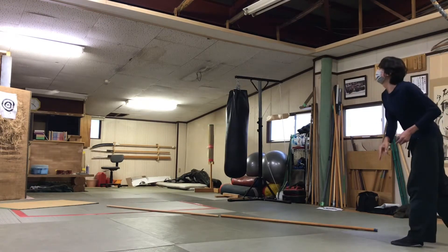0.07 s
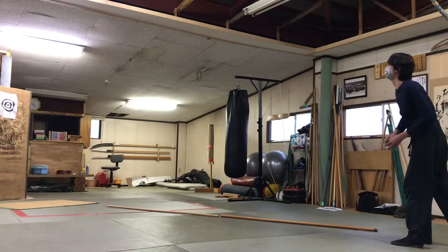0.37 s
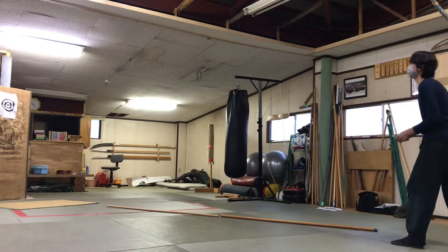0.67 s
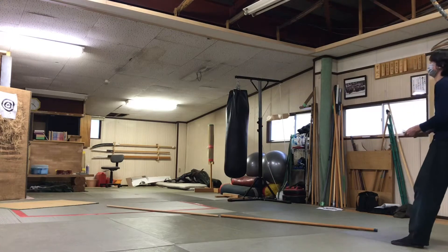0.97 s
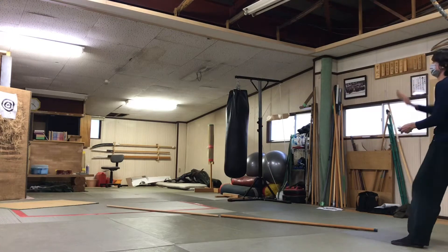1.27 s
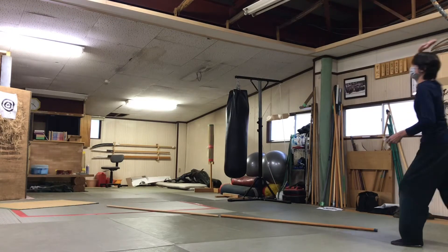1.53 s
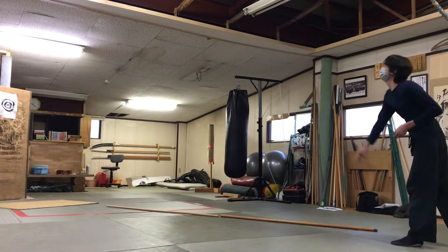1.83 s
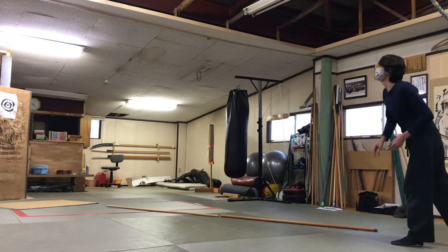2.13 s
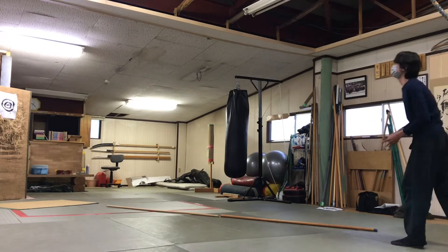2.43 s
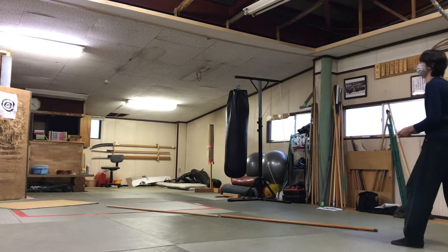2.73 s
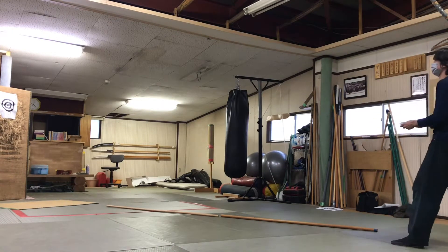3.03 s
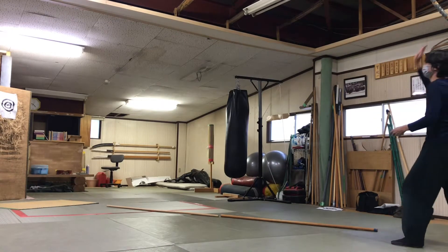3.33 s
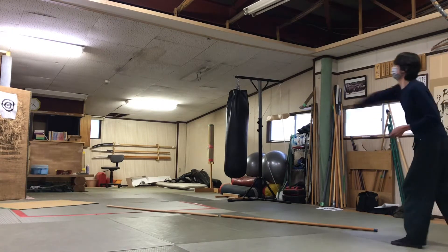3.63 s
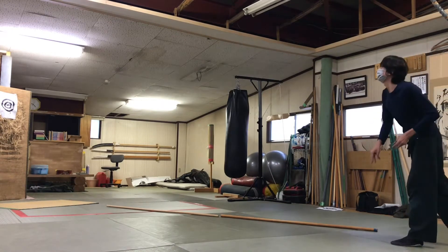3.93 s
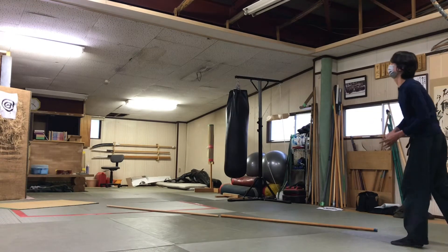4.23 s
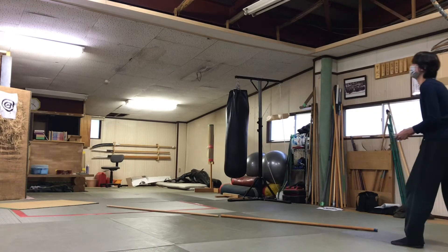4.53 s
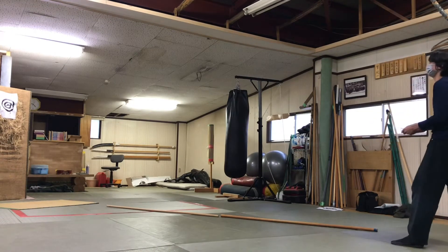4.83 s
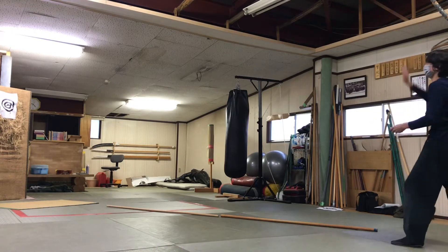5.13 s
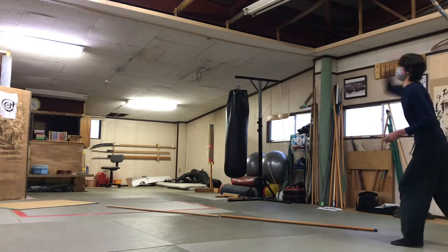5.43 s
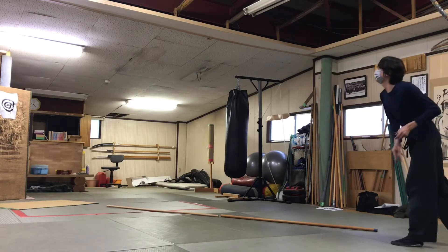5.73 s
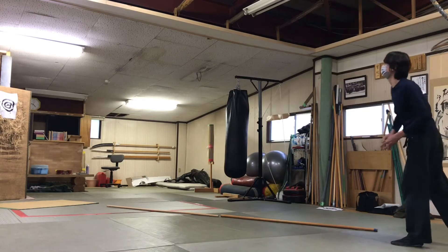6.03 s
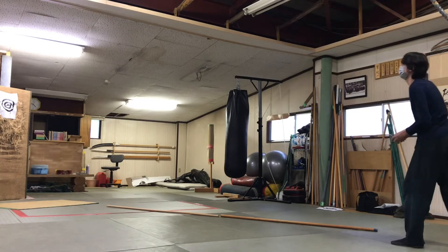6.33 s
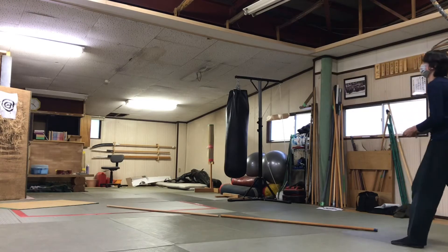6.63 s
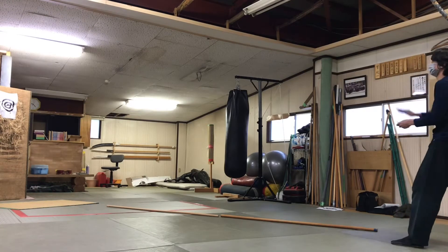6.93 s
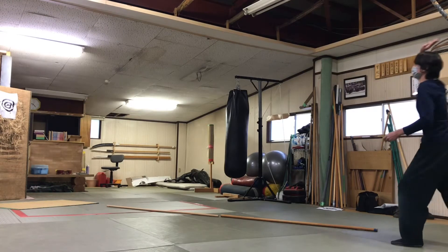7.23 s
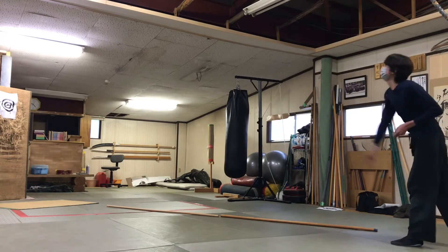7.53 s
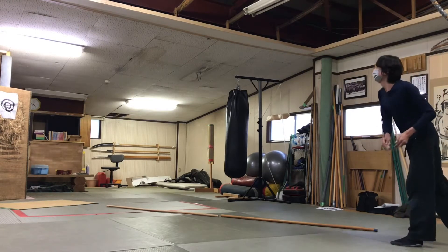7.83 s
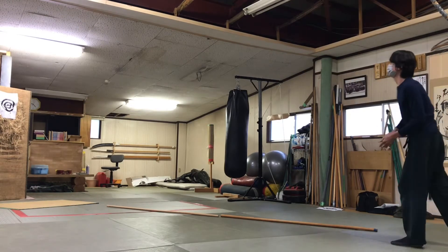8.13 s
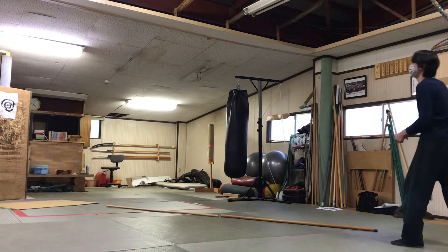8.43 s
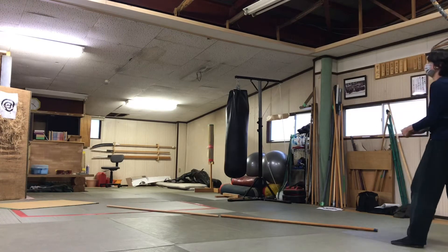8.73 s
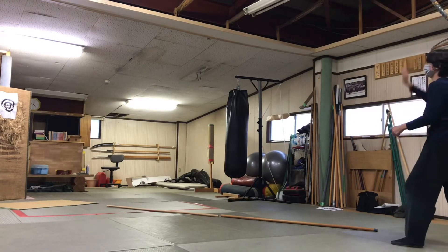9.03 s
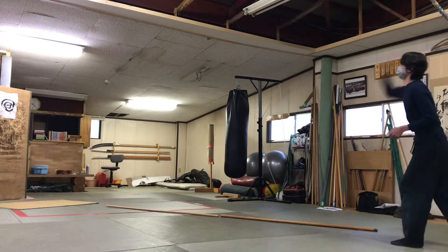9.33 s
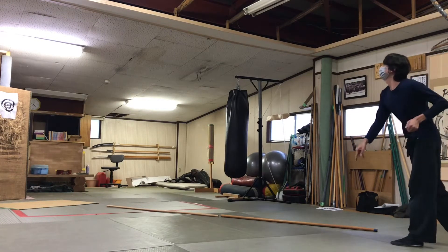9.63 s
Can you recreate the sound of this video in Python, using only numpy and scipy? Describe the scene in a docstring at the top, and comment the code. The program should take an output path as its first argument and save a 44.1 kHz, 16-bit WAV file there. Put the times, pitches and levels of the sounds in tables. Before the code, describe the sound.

Steel spikes are thrown into a wooden target board in an indoor training hall. Five hits land about two seconds apart, each a sharp crack with a low thump and a short room echo. A faint sleeve swish, sometimes with a metallic zing, leads into the throws. Spare spikes clink lightly in the hand between them. A soft step and a last swish follow, over quiet room air.

```python
"""Five steel spikes are thrown into a wooden target board in a matted training hall.
Each throw is a swish of the sleeve, then a crack as the point splits the wood and a thump
as the board flexes, both carried on by the hall. Between throws the spare spikes clink in the
thrower's hand. Near the end come a soft step and one more swish. Behind it all are room air,
a thin hiss, a low hum and a distant rumble."""
import sys
import numpy as np
from scipy import signal
from scipy.fft import rfft, irfft, next_fast_len
from scipy.io import wavfile

SR = 44100
rng = np.random.default_rng(int(sys.argv[2]) if len(sys.argv) > 2 else 0)


def to_wav(s):
    """Save 16-bit WAV."""
    ch = np.atleast_2d(s).T  # columns
    pcm = np.round(np.clip(ch, -1, 1) * 32767)  # PCM
    wavfile.write(sys.argv[1], SR, pcm.astype(np.int16))


N = 431719
TIME = np.arange(SR) / SR  # one second, the life of a blow


def amp(db):
    """Turn decibels into a number to multiply a sound by."""
    return 10 ** (np.asarray(db) / 20)


def unit_energy(x):
    """Scale a sound so that its squared samples add up to 1."""
    return x / np.sqrt(np.sum(x ** 2) + 1e-20)


def look_up(points, hz):
    """Read a (frequency, value) table, joining its points by lines on a log frequency axis."""
    known_hz, value = np.transpose(points)
    return np.interp(np.log(hz + 1), np.log(known_hz + 1), value)


def add(mix, start_s, sound):
    """Mix a sound in at the given time, cutting off whatever runs past the end."""
    part = mix[max(round(start_s * SR), 0):][:len(sound)]
    part += sound[:len(part)]


def noise(spectrum, size):
    """Steady noise shaped by a (frequency, level) table, with an average (rms) size of 1."""
    length = next_fast_len(size)
    gain = amp(look_up(spectrum, np.fft.rfftfreq(length, 1 / SR)))
    shaped = irfft(rfft(rng.standard_normal(length)) * gain, length)[:size]
    return shaped / np.sqrt(np.mean(shaped ** 2) + 1e-20)


def colour(x, spectrum, peaks=(), bright_db=0, size=8192):
    """Filter a sound: give it a broad tone, ringing peaks (or dips) and more or less treble."""
    hz = abs(np.fft.fftfreq(size, 1 / SR))
    db = look_up(spectrum, hz) + bright_db * hz ** 2 / (hz ** 2 + 5500 ** 2)
    for centre, width, height_db in peaks:
        db = db + height_db / (1 + (2 * (hz - centre) / width) ** 2)
    # this makes the filter ring only after a sound, never before it
    log_gain = np.conj(signal.hilbert(np.log(amp(db))))
    response = np.fft.ifft(np.exp(log_gain)).real
    return signal.fftconvolve(x, response[:size // 2])[:len(x)]


def hall(build_s):
    """Echoes off the walls build up over build_s, then each pitch dies away at its own rate."""
    # how long the hall rings: (frequency [Hz], time to fade by 60 dB [s])
    fade_times = [(50, 0.61), (110, 0.22), (220, .5), (560, 0.42), (1500, 0.46), (3800, 0.54), (6000, 0.49),
                  (10000, 0.45), (15000, 0.28)]
    echoes = rng.standard_normal(SR)
    echoes *= np.exp(0.67 * np.exp(-TIME / 0.046) * rng.standard_normal(SR))  # uneven at first
    hz, t, bands = signal.stft(echoes, SR, nperseg=256)
    fade = amp(-60 * t / look_up(fade_times, hz)[:, None])
    tail = signal.istft(bands * fade, SR, nperseg=256)[1][:SR]
    return unit_energy(tail * (1 - np.exp(-TIME / build_s)))


def crunch(length_s):
    """A brief burst of tiny cracks that come in clumps."""
    clumps = np.interp(TIME, np.linspace(0, 1, 900), rng.standard_normal(900))
    cracks = rng.standard_normal(SR) * np.exp(0.35 * clumps)
    rise = 1 - np.exp(-TIME / 0.0003)
    return unit_energy(cracks * rise * np.exp(-(TIME / length_s) ** 2.8))


def background():
    """Room air, a thin hiss, a distant rumble that comes and goes, and a wavering, fading hum."""
    # tone of the room air: (frequency [Hz], relative level [dB])
    air_tone = [(55, -27.5), (90, 2), (128, -10), (200, -2.5), (256, -5), (290, -7), (445, -13.5),
                (620, -8.5), (1000, -14), (2000, -21.5), (4000, -27), (5200, -31), (10000, -35.5),
                (13000, -60.5)]
    # tone of the hiss: (frequency [Hz], relative level [dB])
    hiss_tone = [(7000, -10), (10500, -6.5), (11400, -3.5), (11850, 6.5), (12400, -6), (14000, -4),
                 (16000, 0)]
    # tone of the rumble: (frequency [Hz], relative level [dB])
    rumble_tone = [(15, -32), (30, -13.5), (42, 2), (52, 4.5), (62, -6), (75, -10.5), (100, -24.5),
                   (200, -52.5)]
    # how the rumble swells and sinks: (time [s], relative level [dB])
    rumble_swells = [(0.0, -70.5), (6.9, -66), (7.2, -55), (7.71, -64), (8.13, -57.5), (8.83, -69.5),
                     (9.24, -59.5), (9.79, -65.5)]
    hum_hz, hum_db, fade_db_per_s = 65, -58, 0.8
    t = np.arange(N) / SR
    rumble_db = 3.5 + np.interp(t, *np.transpose(rumble_swells))
    rumble = amp(rumble_db) * noise(rumble_tone, N)
    waver = noise([(0, 0), (2, 0), (8, -30), (40, -100)], N)  # slow drift of pitch and loudness
    hum = np.sin(2 * np.pi * np.cumsum(hum_hz + 0.5 * waver) / SR)
    hum *= (1 + 0.13 * waver) * amp(hum_db - fade_db_per_s * t)
    return amp(-63.5) * noise(air_tone, N) + amp(-69) * noise(hiss_tone, N) + rumble + hum


def thrower():
    """The sleeve swishes, the air whirrs briefly after it, and a foot steps softly on the mat."""
    # swings of the arm: (time of the peak [s], level [dB])
    swings = [(1.78, -57.5), (3.68, -58), (5.55, -58), (7.47, -58.5), (9.44, -59.5)]
    # tone of the sleeve: (frequency [Hz], relative level [dB])
    cloth_tone = [(100, -2), (220, -7.5), (650, -0.5), (1200, -12.5), (2000, -15), (4000, -18.5),
                  (5200, -21.5), (9000, -21), (15000, -21.5)]
    # tone of the whirring air: (frequency [Hz], relative level [dB])
    whirr_tone = [(200, -49), (320, -5.5), (365, -1.5), (450, -20), (800, -48)]
    # the step on the mat: (time [s], relative level [dB])
    steps = [(8.935, -27.5)]
    # tone of the step: (frequency [Hz], relative level [dB])
    step_tone = [(50, 5), (200, 13), (800, 8.5), (2000, 1.5), (5000, -23), (15000, -26)]
    out = np.zeros(N)
    t = TIME - 0.2  # zero at the peak of the swing
    swish_shape = np.where(t < 0, np.exp(-(t / 0.053) ** 2), np.exp(-abs(t) / 0.13))
    whirr_shape = np.exp(-((t - 0.08) / 0.1) ** 2)
    for peak_s, db in swings:
        add(out, peak_s + t[0], amp(db) * swish_shape * noise(cloth_tone, SR))
        add(out, peak_s + t[0], amp(db - 2) * whirr_shape * noise(whirr_tone, SR))
    for start_s, db in steps:
        step = crunch(length_s=0.018) + amp(-5) * hall(build_s=0.0067)
        add(out, start_s, amp(db) * colour(step, step_tone))
    return out


def spike_clinks():
    """Spare steel spikes scrape and ring together in the hand; the hall makes the rings flutter."""
    # spikes touching, in relative levels: (time [s], ring [dB], boost of top note [dB], scrape [dB])
    touches = [(.335, -55.5, 5, -52), (0.6665, -53, 7.5, -34), (2.317, -44, -2.5, -46),
               (2.433, -44.5, 10.5, -32), (2.491, -49, 9, -39), (2.621, -49.5, 5, -35),
               (2.727, -46, -16, -34.5), (4.2892, -47.5, 9, -35), (4.5044, -48.5, 5, -33.5),
               (4.515, -48.5, 7.5, -39), (6.080, -55.5, 2, -48), (6.271, -54, 6.5, -40)]
    # notes of a bending spike: (frequency [Hz], time to fade by 60 dB [s], relative level [dB])
    spike_notes = [(4400, 0.66, -17.5), (8030, 0.39, 0.5), (11970, 0.25, 1)]
    # tone of steel scraping steel: (frequency [Hz], relative level [dB])
    scrape_tone = [(1500, -39), (3800, -5), (4500, -14), (5700, 2), (6600, -0.5), (7400, 2), (8200, 15),
                   (9400, 6), (10800, -5), (12200, 10), (13500, -9), (15500, 7)]
    out = np.zeros(N)
    for start_s, ring_db, top_db, scrape_db in touches:
        echoes = hall(build_s=0.011)
        for (hz, fade_s, note_db), boost_db in zip(spike_notes, (0, 0, top_db)):
            # two nearly equal spikes ring slightly apart in pitch, so their sum pulses
            pair_hz = hz + np.array([[-45], [45]]) + rng.normal(0, 14, (2, 1))
            ring = np.sin(2 * np.pi * pair_hz * TIME).sum(0) * amp(-60 * TIME / fade_s)
            # the fingers stop part of the ring at once, leaving it to the hall
            damped = np.sin(2 * np.pi * hz * TIME) * np.exp(-TIME / 0.0093)
            hall_ring = unit_energy(signal.fftconvolve(damped, echoes)[:SR]) * np.linalg.norm(ring)
            note = amp(-5.5) * ring + amp(-7) * hall_ring
            add(out, start_s, amp(ring_db + note_db + boost_db) * note)
        scrape = crunch(length_s=0.012) + amp(8) * echoes
        add(out, start_s, amp(scrape_db) * colour(scrape, scrape_tone))
    return out


def spike_releases():
    """A spike zings as it slides out of the fingers."""
    # the slides: (time [s], relative level [dB])
    slides = [(1.772, -31), (1.808, -27), (3.722, -35.5), (7.484, -31.5)]
    # broad tone of the zing: (frequency [Hz], relative level [dB])
    zing_tone = [(1000, -30.5), (3600, -18), (4600, -5.5), (7000, -13), (8800, -9), (10400, -12),
                 (13000, -5), (15500, -11)]
    # where the sliding spike rings: (frequency [Hz], width [Hz], height [dB])
    zing_peaks = [(4430, 240, 21), (8250, 380, 4.5), (9400, 440, 2.5)]
    out = np.zeros(N)
    for start_s, db in slides:
        slide = crunch(length_s=0.041) + amp(-1.5) * hall(build_s=0.0087)
        add(out, start_s, amp(db) * colour(slide, zing_tone, zing_peaks))
    return out


def board_hits():
    """The point splits the wood, the spike's shaft slaps home just after, and the board booms."""
    # one row a spike, in relative levels: (time [s], crack [dB], thump [dB], treble [dB],
    # ring of the struck spot [Hz], its height [dB], ring of the shaft [Hz], its height [dB],
    # delay of the slap [s])
    hits = [(.218, -4, -9.5, 0.5, 1005, 10.5, 4150, 8, 0.016),
            (2.1435, -7, -8.5, 5.5, 950, 2.5, 1920, -1, 0.011),
            (4.057, -2.5, -14, 3, 1450, 3, 2808, 9, .015),
            (5.9303, -11, -7.5, -1, 1430, 10, 2500, -7, 0.01),
            (7.875, -1, -11.5, 8.5, 1260, 5, 2830, 9, .010)]
    # tone of the crack straight off the board's face: (frequency [Hz], relative level [dB])
    face_tone = [(40, -32.5), (300, -9), (700, -6), (1000, 6), (1130, -3.5), (1260, 10.5), (1500, 6.5),
                 (1750, 0.5), (2900, 3.5), (5000, 0), (7700, -2.5), (10400, -1.5), (12500, -3), (15500, -4)]
    # tone of the whole board as it fills the hall: (frequency [Hz], relative level [dB])
    board_tone = [(40, -34.5), (150, -7.5), (300, -1.5), (620, 0.5), (1020, -0.5), (1150, -1.5), (1260, 0),
                  (1800, 3.5), (3100, 3), (4200, 1.5), (6300, 0.5), (7700, -3), (11300, -6), (15500, -5)]
    # where the board rings: (frequency [Hz], width [Hz], height [dB])
    board_peaks = [(202, 23, 12.5), (357, 40, 7), (638, 54, 11), (780, 47, 5), (977, 100, 7.5),
                   (1220, 50, 2), (1390, 98, 4.5), (1780, 46, 2), (2036, 17, 5.5), (2270, 21, 4),
                   (2500, 45, 2.5), (2710, 92, 2), (2880, 66, -1.5), (3000, 30, 1.5), (3300, 48, 4),
                   (3800, 35, 2)]
    # tone of the board flexing on its stand: (frequency [Hz], relative level [dB])
    thump_tone = [(20, -24), (35, 0.5), (58, 19), (80, 10.5), (118, 15.5), (160, 7.5), (203, 10.5),
                  (260, 7), (400, 7.5), (700, 6.5), (1100, -16), (4000, -33.5)]
    flex_s = 0.005  # the heavy board booms a moment after the crack
    out = np.zeros(N)
    for start_s, crack_db, thump_db, bright_db, spot_hz, spot_db, shaft_hz, shaft_db, slap_s in hits:
        # the point's crack, then the shaft's softer slap
        direct, echoes = crunch(length_s=0.011), hall(build_s=0.0075)
        add(direct, slap_s, amp(-2.5) * crunch(length_s=0.007))
        add(echoes, slap_s, amp(-4.5) * hall(build_s=0.0035))
        # where the spike lands decides which rings stand out; they are clearest in the direct sound
        direct_peaks = [(spot_hz, 200, spot_db), (shaft_hz, 400, shaft_db)]
        echo_peaks = board_peaks + [(spot_hz, 300, 0.6 * spot_db)]
        add(out, start_s, amp(crack_db + 6) * colour(direct, face_tone, direct_peaks, bright_db))
        add(out, start_s, amp(crack_db + 8) * colour(echoes, board_tone, echo_peaks, bright_db))
        boom = hall(build_s=0.0074) + amp(-11) * crunch(length_s=0.015)
        add(out, start_s + flex_s, amp(thump_db + 11.5) * colour(boom, thump_tone))
    return out


def scene():
    """All the sounds of the hall together, in one channel."""
    return (board_hits() + spike_clinks() + spike_releases() + thrower() + background())[None]


def record(dry):
    """The microphone puts two dips in the treble, and the very highest sounds are cut off."""
    # narrow dips from the microphone's opening: (frequency [Hz], width [Hz], level change [dB])
    dips = [(7630, 700, -3), (10380, 700, -6)]
    cutoff_hz = 15900
    heard = colour(dry[0], [(20, 0), (20000, 0)], dips)
    low_pass = signal.firwin(401, cutoff_hz, window=("kaiser", 9), fs=SR)
    return signal.oaconvolve(heard, low_pass, "same")[None]


dry = scene()
out = record(dry)
to_wav(out)
```